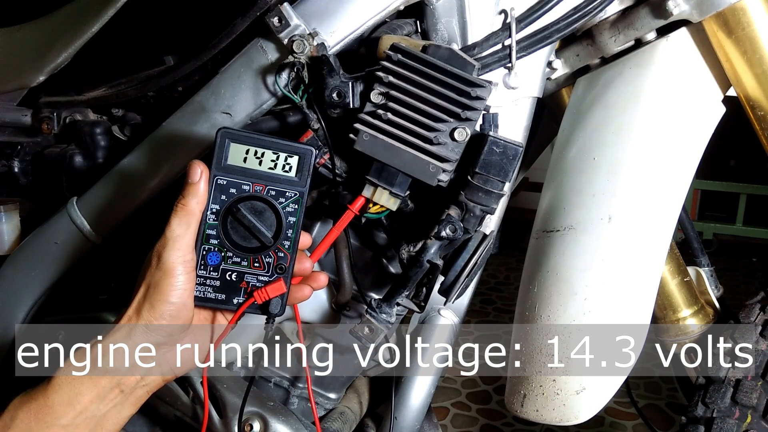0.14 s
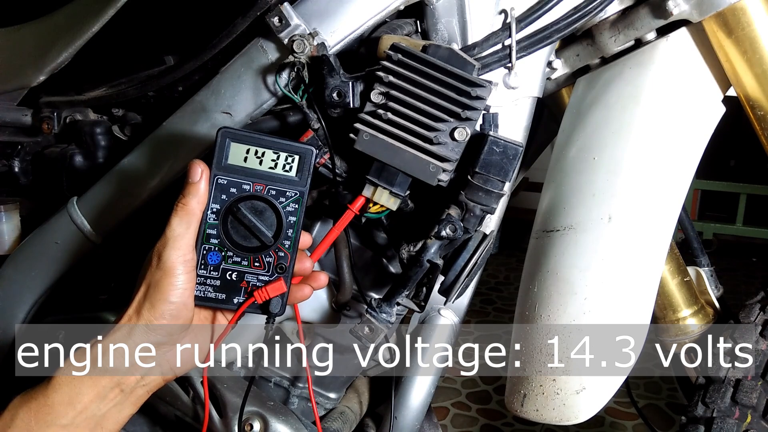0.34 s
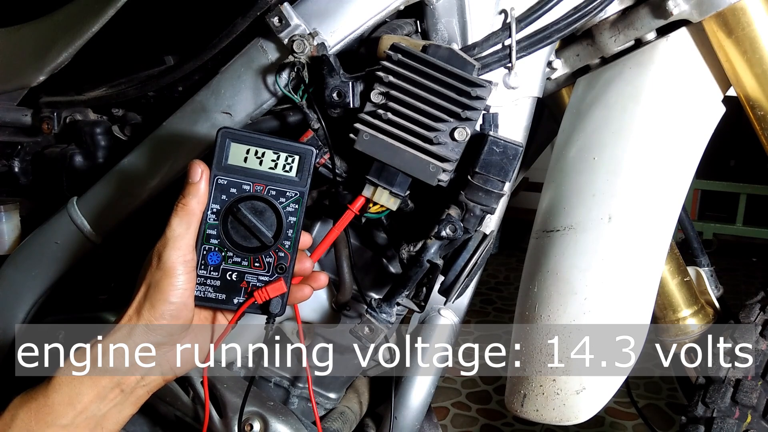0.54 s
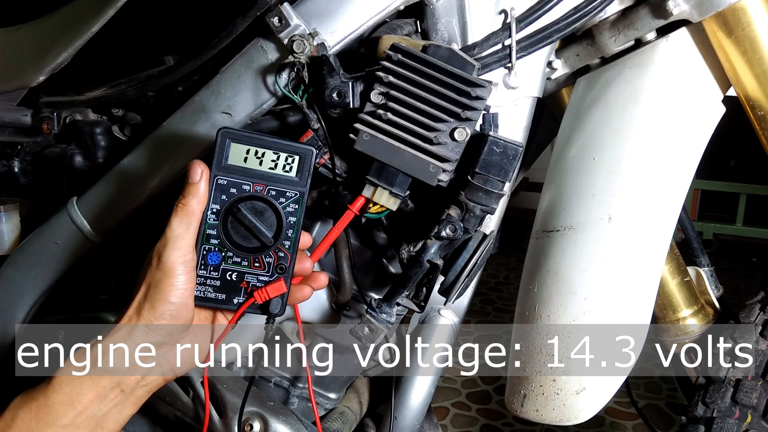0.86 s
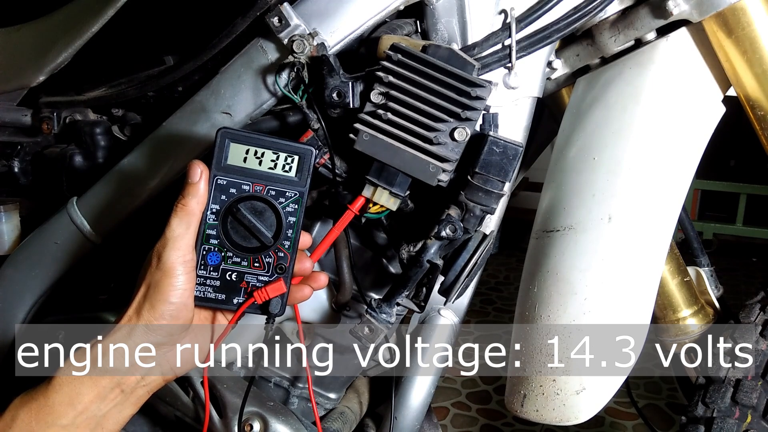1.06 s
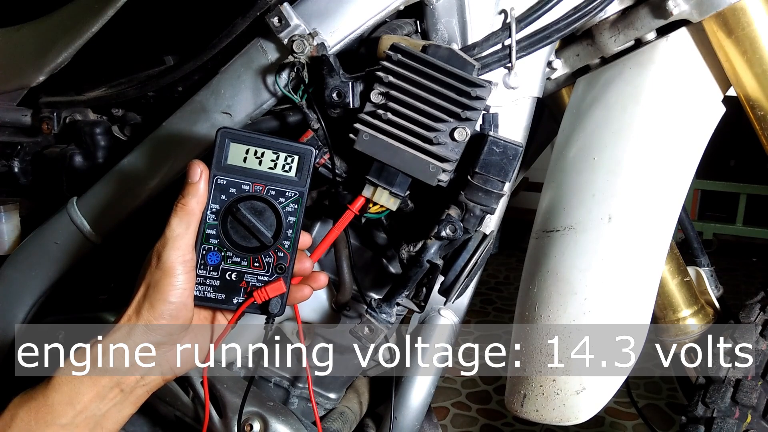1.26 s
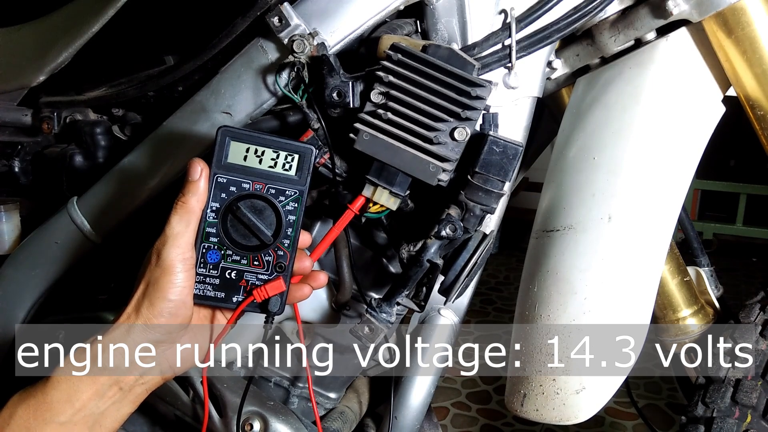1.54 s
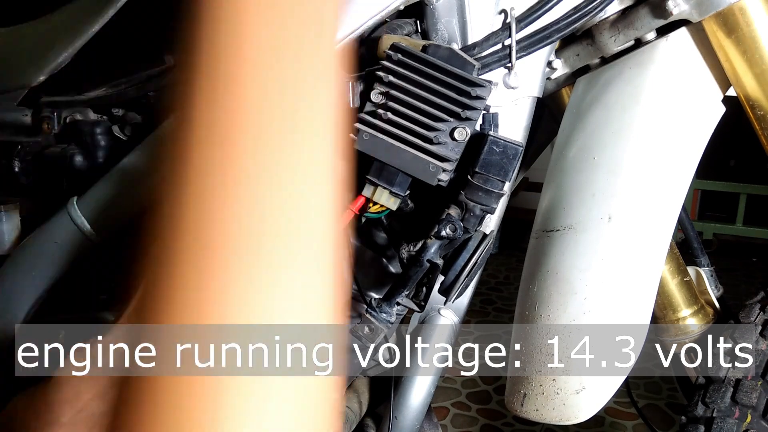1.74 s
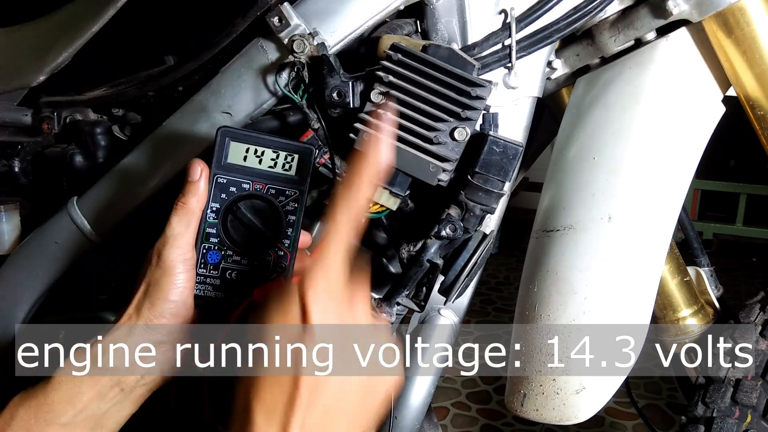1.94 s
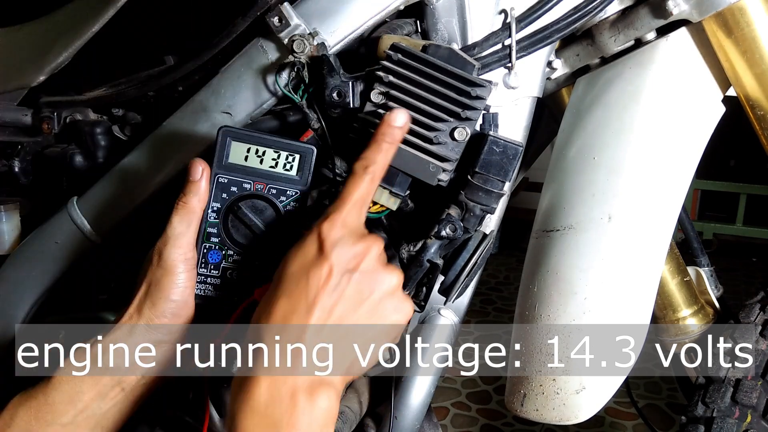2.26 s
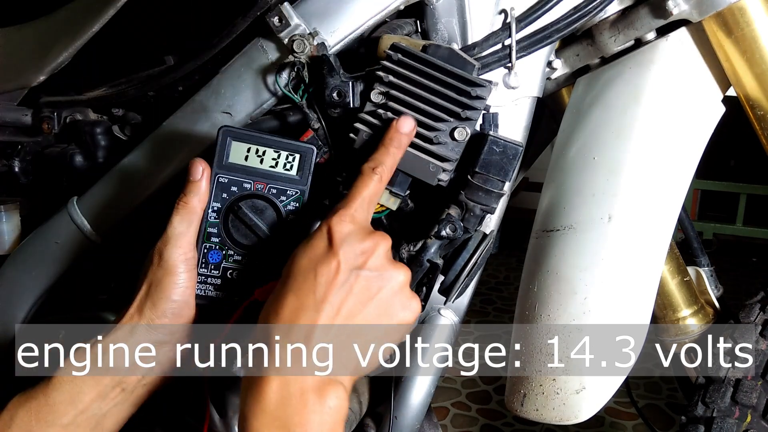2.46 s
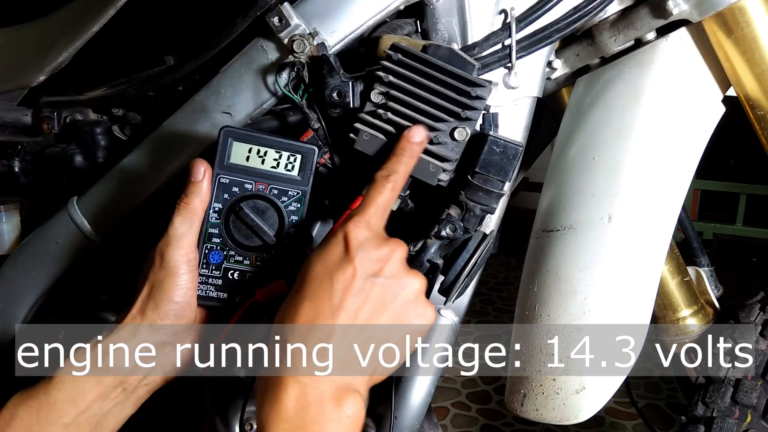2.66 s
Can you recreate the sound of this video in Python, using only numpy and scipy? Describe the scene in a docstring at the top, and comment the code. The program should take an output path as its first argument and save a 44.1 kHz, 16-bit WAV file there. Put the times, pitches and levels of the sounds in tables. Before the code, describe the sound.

A single-cylinder motorcycle engine is blipped twice, then drops to a slow thumping idle.

```python
"""Exhaust of a single-cylinder four-stroke motorcycle: each cycle's gas pulse rings the silencer and pipe.
Place: outdoors. Distance: beside the engine.
Microphone: stereo, engine centred, the treble of knock, intake and hiss wide.
The engine is blipped twice and drops to idle. Under throttle, noise bursts knock the cylinder and gulp at the intake.
Piston and valve contacts shake the crankcase and ring the fins, the cam chain buzzes at the top of each rev,
a hiss pulses with the cycle, slaps ring the cylinder, loose metal clanks, and soft chuffs fill the idle."""
import sys
import numpy as np
from scipy import signal
from scipy.fft import rfft, irfft, next_fast_len
from scipy.io import wavfile
from scipy.ndimage import uniform_filter1d, map_coordinates

SR = 44100
rng = np.random.default_rng(int(sys.argv[2]) if len(sys.argv) > 2 else 0)


def wav_out(sig):
    """Save sig, one row per channel (or a flat mono array), as 16-bit PCM at SR to the path in sys.argv[1]."""
    wavfile.write(sys.argv[1], SR, np.round(np.clip(np.atleast_2d(sig).T, -1, 1) * 32767).astype(np.int16))


N = 123479
T = np.arange(N) / SR  # s


def from_db(db):
    """Decibels to gain."""
    return 10 ** (np.asarray(db) / 20)


def rms_one(x):
    """Scale to unit rms."""
    return x / np.sqrt(np.mean(x ** 2) + 1e-20)


def even(x):
    """Level the mean over about 90 ms, keeping the single strokes."""
    return x / np.sqrt(uniform_filter1d(x ** 2, size=SR // 11) + 1e-12)


def curve(rows, s=T, axis=1):
    """One column of a time table, read at times s."""
    rows = np.array(rows)
    return np.interp(s, rows[:, 0], rows[:, axis])


def colour(x, points):
    """Causal (minimum-phase) filter with the given (f/Hz, level/dB) outline."""
    size = next_fast_len(N + SR // 2, True) // 2 * 2
    hz, db = np.transpose(points)
    bins_hz = np.arange(size // 2 + 1) * SR / size
    outline_db = np.interp(np.log(bins_hz + 1), np.log(hz), db)
    cepstrum = irfft(np.log(from_db(outline_db)))
    # folding the cepstrum onto positive time makes the phase minimum
    cepstrum[1:size // 2] *= 2
    cepstrum[size // 2 + 1:] = 0
    response = np.exp(rfft(cepstrum))
    return irfft(rfft(x, size) * response)[:N]


def resonate(x, hz, width):
    """Resonance of this width in Hz, with unit gain at its centre."""
    r = np.exp(-np.pi * width / SR)
    zeros = np.array([1, 0, -1]) * (1 - r * r) / 2
    poles = [1, -2 * r * np.cos(2 * np.pi * hz / SR), r * r]
    return signal.lfilter(zeros, poles, x + 1e-18)


def body(x, modes):
    """Resonances in parallel."""
    return sum(from_db(db) * resonate(x, hz, width) for hz, width, db in modes)


def clicks(s, db):
    """Impulses at times s."""
    out = np.zeros(N)
    inside = (s >= 0) & (s < T[-1])
    np.add.at(out, (s[inside] * SR).astype(int), from_db(db)[inside])
    return out


def fade(hits, decay_s):
    """Each impulse becomes an exponential decay."""
    return signal.lfilter([1], [1, -np.exp(-1 / (decay_s * SR))], hits + 1e-18)


def burst(hits, rise_s, decay_s):
    """Each impulse becomes a quick swell and an exponential decay."""
    return fade(hits, decay_s) - fade(hits, rise_s)


def flutter(hz):
    """Random movement up to about this rate, spread 1."""
    lowpass = signal.butter(2, hz, fs=SR, output="sos")
    return rms_one(signal.sosfilt(lowpass, rng.standard_normal(N)))


def grainy_noise(grain_db, grain_hz):
    """White noise whose level flutters quickly."""
    return rms_one(rng.standard_normal(N) * from_db(grain_db * flutter(grain_hz)))


def rough_tone(hz, width_hz):
    """A tone whose phase wanders, which widens its line."""
    wander = np.sqrt(2 * np.pi * abs(width_hz) / SR) * rng.standard_normal(N)
    return np.sin(np.cumsum(2 * np.pi * hz / SR + wander))


def times_at(cycles, share):
    """The moments at which the engine passes this point of its cycle."""
    passes = np.arange(np.floor(cycles[-1]) + 1) + share
    return np.interp(passes, cycles, T, left=-1, right=T[-1])


def orders(cycles, size=1024):
    """One vibration pattern repeated every cycle: a comb of engine orders that glides with the speed."""
    pattern = rng.standard_normal(size)
    return even(map_coordinates(pattern, [cycles % 1 * size], order=3, mode="grid-wrap"))


# engine speed: t/s, rate/(cycles per s)
ENGINE_SPEED = [(0.0, 28.58), (0.12, 29.61), (0.24, 40.21), (0.33, 41.31), (0.43, 34.67), (0.62, 27.11),
                (0.82, 21.24), (1.08, 15.41), (1.2, 22.18), (1.35, 30.15), (1.51, 42.09), (1.63, 34.52),
                (1.8, 28.66), (2.0, 22.31), (2.25, 17.05), (2.34, 13.6), (2.45, 11.75), (2.6, 11.3),
                (2.8, 11.2)]


def engine_speed(s=T):
    """The two blips and the drop to idle, in cycles per second."""
    return curve(ENGINE_SPEED, s)


# strength of the exhaust pulses: t/s, silencer boom level/dB, pipe bark level/dB
PULSE_STRENGTH = [(0, -23, 1), (.1, -0.5, -7), (.2, -4, -7.5), (.31, -5, 2), (.34, 0, 10), (.46, -4.5, 0.5),
                  (.6, 5.5, -3), (.67, -12, -3), (.73, -10, -20), (1.05, -14.5, -41), (1.09, -18, -2),
                  (1.16, -18, -6), (1.27, -13.5, 0.5), (1.34, -6, -18), (1.42, -7, -26), (1.53, -5, -10),
                  (1.565, -5, 5.5), (1.7, -2, -2), (1.82, 1.5, -2.5), (1.92, -14.5, -16), (2.08, -13, -16),
                  (2.27, -27, -51)]
# cycles that catch and fire with the throttle shut: t/s, boom level/dB
CATCHES = [(.655, -6.5), (.78, -2.5), (.875, -2.5), (1.97, -3.5), (2.163, -10.5)]
# two silencer chambers in series: f/Hz, width/Hz
SILENCER_CHAMBERS = [(68.5, 11.9), (78, 44)]
# pipe resonances: f/Hz, width/Hz, level/dB
PIPE_MODES = [(108.7, 14, 1.5), (132, 10.6, -4), (153.4, 17.4, 1.5), (177, 16, -14)]
# outlines of the boom and the bark: f/Hz, level/dB
SILENCER_LOSS = [(22, -36), (40, -8), (60, 0), (100, 0.5), (160, 4), (400, -37.5)]
PIPE_LOSS = [(50, -25.5), (100, -0.5), (170, -5.5), (230, -15.5), (400, -10.5), (1500, -47)]
IDLE_FROM_S, IDLE_BOOM_DB, IDLE_BARK_DB = 2.31, -3, -6.5
BOOM_DB, BARK_DB, PULSE_SPREAD_DB = 25.5, 12.5, .4


def exhaust(cycles):
    """One gas pulse a cycle rings the silencer and the pipe; weak on the overrun, firm again at idle."""
    s = times_at(cycles, 0)
    boom_db = np.where(s > IDLE_FROM_S, IDLE_BOOM_DB, curve(PULSE_STRENGTH, s))
    bark_db = np.where(s > IDLE_FROM_S, IDLE_BARK_DB, curve(PULSE_STRENGTH, s, axis=2))
    for at, db in CATCHES:
        boom_db[np.argmin(abs(s - at))] = db
    uneven_db = PULSE_SPREAD_DB * rng.standard_normal(len(s))
    boom = clicks(s, BOOM_DB + boom_db + uneven_db)
    for hz, width in SILENCER_CHAMBERS:
        boom = resonate(boom, hz, width)
    bark = body(clicks(s, BARK_DB + bark_db + uneven_db), PIPE_MODES)
    return colour(boom, SILENCER_LOSS) + colour(bark, PIPE_LOSS)


# force that follows the throttle: t/s, level/dB
THROTTLE_FORCE = [(0, -6.5), (.17, -1), (.27, -2), (.36, -7), (.6, -36), (1.02, -52), (1.06, -12),
                  (1.14, -5), (1.25, -5.5), (1.38, -1), (1.47, -10), (1.58, -10), (1.8, -43), (2.3, -45),
                  (2.8, -24)]


def throttle_db(s):
    """How hard the engine pulls at times s."""
    return curve(THROTTLE_FORCE, s)


# knock spectrum: f/Hz, level/dB
KNOCK_COLOUR = [(60, -35), (120, 11), (200, -10), (300, 13), (372, -4.5), (450, 4), (800, 5), (1400, 4.5),
                (2100, -36), (3300, -10), (6000, -9.5), (9500, 0.5), (12500, -3), (14300, -6)]
# hollow ring of the knock: f/Hz, width/Hz, level/dB
AIRBOX_MODES = [(310, 12, -0.5), (617, 20, 13), (896, 74, 10.5), (987, 19, 14)]
KNOCK_LEAD_S = 0.0253  # the knock comes before the exhaust pulse
KNOCK_DB, KNOCK_ORDERS_DB = -37, -1


def knock(cycles):
    """Each combustion under throttle chugs: a short broad burst with a hollow ring."""
    s = times_at(cycles, 0) - KNOCK_LEAD_S
    force = burst(clicks(s, KNOCK_DB + throttle_db(s)), rise_s=.002, decay_s=.015)
    vibration = rng.standard_normal(N) + from_db(KNOCK_ORDERS_DB) * orders(cycles)
    chug = force * rms_one(colour(vibration, KNOCK_COLOUR))
    return chug + body(chug, AIRBOX_MODES)


# gulp resonances: f/Hz, width/Hz, level/dB
GULP_MODES = [(285, 38, 1), (290, 15, 0), (353, 25, -6.5), (426, 71, -2.5)]
# outlines of the gulp and the spit: f/Hz, level/dB
GULP_BAND = [(100, -11), (250, -3), (500, -1), (1200, -18), (3000, -43)]
SPIT_COLOUR = [(3000, -42), (6500, -14), (9500, -16), (12000, 5), (14200, 4)]
GULP_DB, GULP_DB_PER_RATE = -16.5, -0.6656  # at the lowest speed; dB per (cycle per s) above it
SPIT_DB = -47


def intake(cycles):
    """Each intake stroke through the open carburettor: a hollow gulp that fades with speed, and a thin spit."""
    s = times_at(cycles, 0) - KNOCK_LEAD_S
    opening_db = throttle_db(s)
    above_lowest = engine_speed(s) - engine_speed().min()
    gulp_db = GULP_DB + opening_db + GULP_DB_PER_RATE * above_lowest
    gulp = burst(clicks(s, gulp_db), rise_s=0.002, decay_s=0.033) * rng.standard_normal(N)
    spit = burst(clicks(s, SPIT_DB + opening_db), rise_s=0.002, decay_s=0.012)
    spit_noise = rms_one(colour(rng.standard_normal(N), SPIT_COLOUR))
    return colour(body(gulp, GULP_MODES), GULP_BAND) + spit * spit_noise


# piston and valve contacts: share of the cycle, level/dB
CONTACTS = [(.08, -9.5), (.3, 0), (0.548, -3.5), (0.779, -4)]
CONTACT_SPREAD_DB, CONTACT_JITTER_S = 1.5, 0.00087


def contacts(cycles, decay_s, chatter_db, orders_db):
    """Piston and valve strokes swell a bed of engine orders and fine chatter, at an even mean level."""
    s = np.concatenate([times_at(cycles, share) for share, _ in CONTACTS])
    db = np.repeat([db for _, db in CONTACTS], len(s) // len(CONTACTS))
    late, hard = rng.standard_normal((len(s), 2)).T
    hits = clicks(s + CONTACT_JITTER_S * late, db + CONTACT_SPREAD_DB * hard)
    strokes = burst(hits, rise_s=.002, decay_s=decay_s)
    vibration = rng.standard_normal(N) + from_db(orders_db) * orders(cycles)
    return even((strokes + from_db(chatter_db)) * vibration)


# rattle level: t/s, level/dB
RATTLE_LEVEL = [(0, -38.5), (.2, -38), (.32, -38), (.5, -43.5), (.66, -49), (.8, -54.5), (1.04, -59.5),
                (1.17, -51.5), (1.32, -40.5), (1.52, -38), (1.65, -41), (1.85, -49), (2.1, -59),
                (2.3, -61.5), (2.45, -62.5), (2.65, -62.5), (2.8, -56)]
# colour of the cases: f/Hz, level/dB
CASE_COLOUR = [(25, -2), (100, 3.5), (200, -8), (290, 0), (340, -0.5), (372, -25.5), (410, 4.5), (460, 2.5),
               (510, -7), (900, -2.5), (1200, 0), (1550, -1), (2300, -9), (3600, -20), (6000, -63)]
# resonances of the cases: f/Hz, width/Hz, level/dB
CASE_MODES = [(569, 15, 8.5), (619, 19, 14.5), (745, 58, 0.5), (880, 45, 2.5), (1050, 38, -4),
              (1334, 65, 0), (1403, 38, 6.5), (1543, 17, 1)]
RATTLE_DB = 1


def crankcase(cycles):
    """The contacts rattle through the hollow engine cases."""
    drive = colour(contacts(cycles, decay_s=0.0063, chatter_db=-9.5, orders_db=2), CASE_COLOUR)
    return from_db(RATTLE_DB + curve(RATTLE_LEVEL)) * even(drive + body(drive, CASE_MODES))


# clatter level: t/s, level/dB
CLATTER_LEVEL = [(0, -54.5), (.15, -41.5), (.27, -36), (.42, -40.5), (.62, -46.5), (.85, -57),
                 (1.05, -64.5), (1.2, -53.5), (1.33, -47.5), (1.42, -46.5), (1.52, -37.5), (1.66, -42),
                 (1.85, -51.5), (2.15, -60.5), (2.35, -68.5), (2.62, -74), (2.8, -69)]
# main modes of cylinder and fins: f/Hz, width/Hz, level/dB
FIN_MODES = [(1873, 32, 9.5), (2028, 200, 7), (2524, 126, -1), (2947, 490, 15)]
# outlines of the main modes and of the dense minor modes: f/Hz, level/dB
FIN_BAND = [(900, -23.5), (1600, 6), (2300, 5.5), (2900, -11.5), (3600, -16), (8000, -39.5)]
FIN_SPREAD = [(900, -15), (1600, -20), (2100, -0.5), (2900, -17), (3600, -39), (6000, -12.5)]
CLATTER_DB = 2.5


def top_end(cycles):
    """The contacts ring the cylinder and its fins near 2 kHz."""
    drive = contacts(cycles, decay_s=0.004, chatter_db=0, orders_db=0)
    ring = colour(body(drive, FIN_MODES), FIN_BAND)
    return from_db(CLATTER_DB + curve(CLATTER_LEVEL)) * even(ring + colour(drive, FIN_SPREAD))


def taps(cycles, ring_s, spread_db, jitter_s):
    """Each contact has a dense ring of its own that comes back every cycle; even mean level."""
    out, age = 0, T[:SR // 20]
    for share, db in CONTACTS:
        s = times_at(cycles, share)
        late, hard = rng.standard_normal((len(s), 2)).T
        ring = rng.standard_normal(len(age)) * np.exp(-age / ring_s)
        hits = clicks(s + jitter_s * late, db + spread_db * hard)
        out = out + signal.fftconvolve(hits, ring)[:N]
    return even(out)


# hiss level: t/s, level/dB
HISS_LEVEL = [(0, -46.5), (.15, -42.5), (.3, -39.5), (.58, -46), (.82, -53), (1.07, -61), (1.17, -52.5),
              (1.3, -48), (1.52, -41), (1.75, -45.5), (2.05, -55), (2.36, -70), (2.64, -74), (2.68, -69),
              (2.74, -70.5), (2.77, -62), (2.8, -67)]
# hiss spectrum: f/Hz, level/dB
HISS_COLOUR = [(2500, -27), (3800, -4), (4900, 2), (5500, 2.5), (6100, 4.5), (6900, 4), (7900, 3.5),
               (8700, 4), (9600, 2), (11000, -0.5), (12500, -4), (14300, -8.5)]
# resonances of the chain and small steel parts: f/Hz, width/Hz, level/dB
STEEL_MODES = [(5260, 42, -1), (5960, 87, 0.5), (6700, 290, -9.5), (7830, 480, -0.5), (9260, 240, -1.5),
               (10330, 590, -9.5)]
HISS_DB, HISS_SWING_DB, HISS_PHASE = 1.5, 2.2, 0.0085  # phase as a share of the cycle
TICK_DB, STEEL_FLICKER_DB, STEEL_FLICKER_HZ = -8, 4.5, 18


def hiss(cycles):
    """Sizzle of chain and intake air with steely ticks, swelling once a cycle."""
    swing_db = HISS_SWING_DB * np.cos(2 * np.pi * (cycles - HISS_PHASE))
    level = from_db(HISS_DB + curve(HISS_LEVEL) + swing_db)
    ticks = from_db(TICK_DB) * taps(cycles, ring_s=0.011, spread_db=11.5, jitter_s=0.00028)
    drive = colour(grainy_noise(grain_db=0.5, grain_hz=500) + ticks, HISS_COLOUR)
    rings = 0
    for hz, width, db in STEEL_MODES:
        flicker_db = STEEL_FLICKER_DB * flutter(STEEL_FLICKER_HZ)
        rings = rings + from_db(db + flicker_db) * resonate(drive, hz, width)
    return level * rms_one(drive + rings)


# background air spectrum: f/Hz, level/dB
AIR_COLOUR = [(25, 5), (100, 11), (400, -12), (1300, -1), (3500, -11), (8000, -21), (14000, -10.5)]
AIR_DB = -65


def air():
    """Steady outdoor air noise, strongest in the bass."""
    return from_db(AIR_DB) * rms_one(colour(rng.standard_normal(N), AIR_COLOUR))


# outline of the chain and slap rings: f/Hz, level/dB
RING_BAND = [(700, -43), (1500, -17), (1750, -2), (2150, -0.5), (2500, -18), (3600, -33), (8000, -58)]
CHAIN_HZ, CHAIN_HZ_PER_RATE, CHAIN_WIDTH_HZ = 2015, 16, 110  # at full speed; Hz per (cycle per s)
CHAIN_DB, CHAIN_DB_PER_RATE = -23.5, 1.5  # at full speed; dB per (cycle per s)
CHAIN_WHIPS_PER_CYCLE, CHAIN_SHARPNESS = 3, 6


def chain(cycles):
    """The cam chain whips its guide: a buzzing ring that climbs and swells toward the top of each rev."""
    below_full = engine_speed() - engine_speed().max()
    whips = abs(np.sin(np.pi * CHAIN_WHIPS_PER_CYCLE * cycles)) ** CHAIN_SHARPNESS
    tone = rough_tone(CHAIN_HZ + CHAIN_HZ_PER_RATE * below_full, CHAIN_WIDTH_HZ)
    level = from_db(CHAIN_DB + CHAIN_DB_PER_RATE * below_full)
    return colour(level * whips * tone, RING_BAND)


# hard piston slaps: t/s, level/dB, f/Hz
SLAPS = [(.013, -30, 1823), (0.084, -29.5, 1878), (0.145, -22.5, 1830), (.177, -20, 1860),
         (0.202, -22, 1876), (1.077, -39.5, 1888), (1.221, -32.5, 1805), (1.26, -29.5, 1850),
         (1.362, -24.5, 1815), (1.398, -23.5, 1870), (1.424, -20, 1870), (1.794, -31, 1960),
         (2.141, -45, 1903)]


def slaps():
    """Each hard piston slap swells and dies as one rough ring of the cylinder."""
    s, db, hz = np.transpose(SLAPS)
    force = burst(clicks(s, db), rise_s=0.003, decay_s=0.008)
    tone = rough_tone(np.interp(T, s, hz), width_hz=45)
    return colour(2 * force * tone, RING_BAND)


# clanks of loose parts: t/s, level/dB
CLANKS = [(0.669, -27.5), (0.718, -26.5), (0.731, -28.5), (0.922, -30.5), (1.911, -31), (2.742, -42),
          (2.769, -38.5)]
# their resonances: f/Hz, width/Hz, level/dB
CLANK_MODES = [(1352, 46, 7.5), (1510, 60, 3), (1820, 120, 2.5)]
# their outline: f/Hz, level/dB
CLANK_BAND = [(500, -27), (1100, 3.5), (1900, 2.5), (3200, 4)]


def clanks():
    """Brief buzzing knocks of loose metal as the engine slows."""
    s, db = np.transpose(CLANKS)
    force = burst(clicks(s, db), rise_s=0.0014, decay_s=0.0089)
    return colour(body(force * rng.standard_normal(N), CLANK_MODES), CLANK_BAND)


# chuff resonances: f/Hz, width/Hz, level/dB
CHUFF_MODES = [(453, 18, -4), (620, 33, 2), (735, 28, 5), (936, 49, -1.5), (1130, 68, -8.5), (1300, 80, -7),
               (2005, 110, -2)]
# chuff outline: f/Hz, level/dB
CHUFF_BAND = [(200, -14), (450, 1.5), (2000, -2), (3200, -18), (8000, -40)]
CHUFF_DB, CHUFF_LAG_S = -35.5, 0.051  # lag behind the exhaust pulse


def chuffs(cycles):
    """Rounded, hollow puffs of air between the idle thumps."""
    s = times_at(cycles, 0)
    s = s[s > IDLE_FROM_S] + CHUFF_LAG_S
    flow = burst(clicks(s, np.full(len(s), CHUFF_DB)), rise_s=0.014, decay_s=0.044)
    return colour(body(flow * rng.standard_normal(N), CHUFF_MODES), CHUFF_BAND)


# stereo width of knock, intake and hiss: f/Hz, side minus mid level/dB
TREBLE_WIDTH = [(3200, -70), (3900, -41), (4700, -54), (6000, -14.5), (8500, -4), (12000, -5.5),
                (14500, -9)]


def scene():
    """The engine stands in the middle; knock, intake and hiss have wide treble."""
    cycles = np.cumsum(engine_speed()) / SR
    # two independent draws, one for the middle and one for the sides
    bright, side = [knock(cycles) + intake(cycles) + hiss(cycles) for _ in range(2)]
    metal = crankcase(cycles) + top_end(cycles) + chain(cycles) + slaps() + clanks()
    mid = exhaust(cycles) + metal + chuffs(cycles) + bright + air()
    side = colour(side, TREBLE_WIDTH)
    return np.array([mid + side, mid - side])


CUTOFF_HZ = 14500


def record(dry):
    """The top is cut steeply."""
    lowpass = signal.ellip(12, .2, 80, CUTOFF_HZ, fs=SR, output="sos")
    return signal.sosfilt(lowpass, dry)


dry = scene()
out = record(dry)
wav_out(out)
```